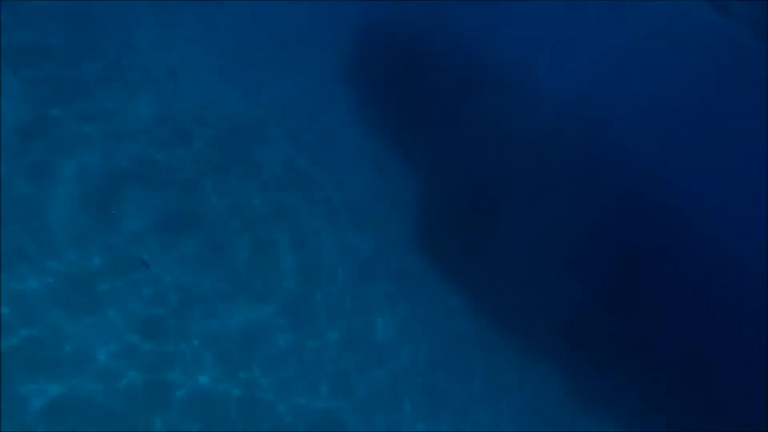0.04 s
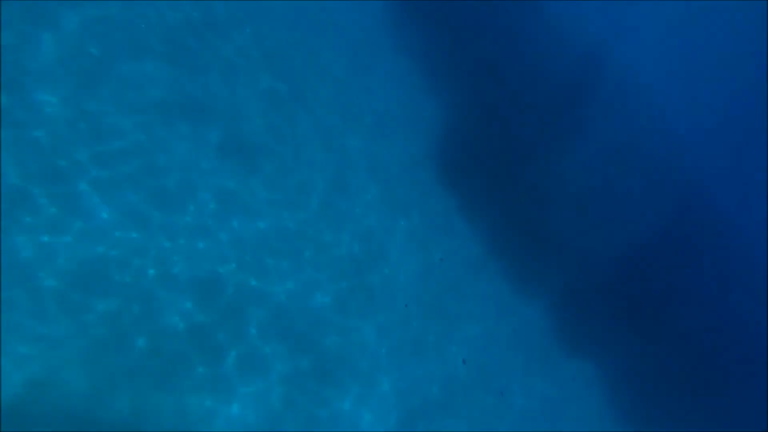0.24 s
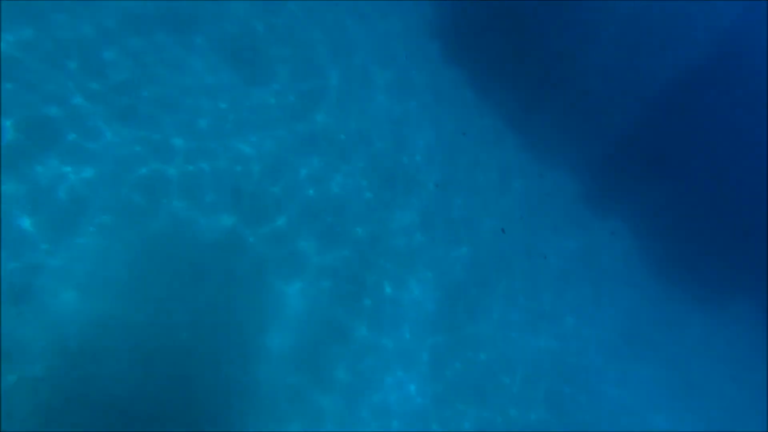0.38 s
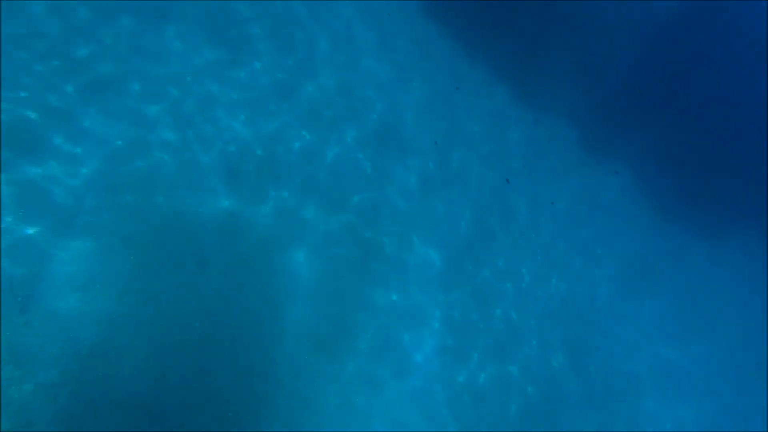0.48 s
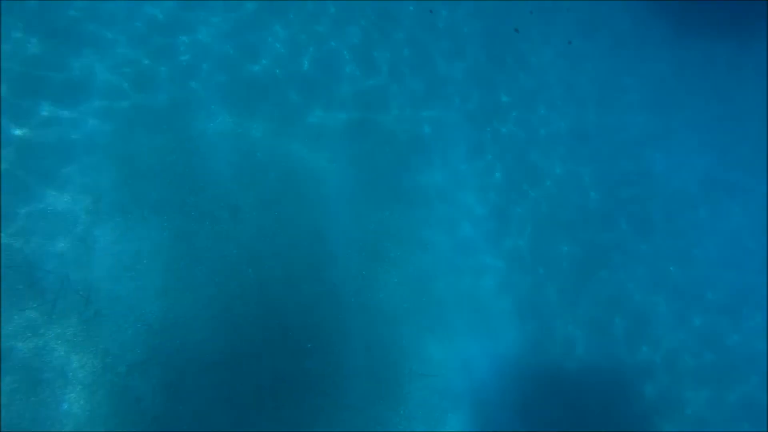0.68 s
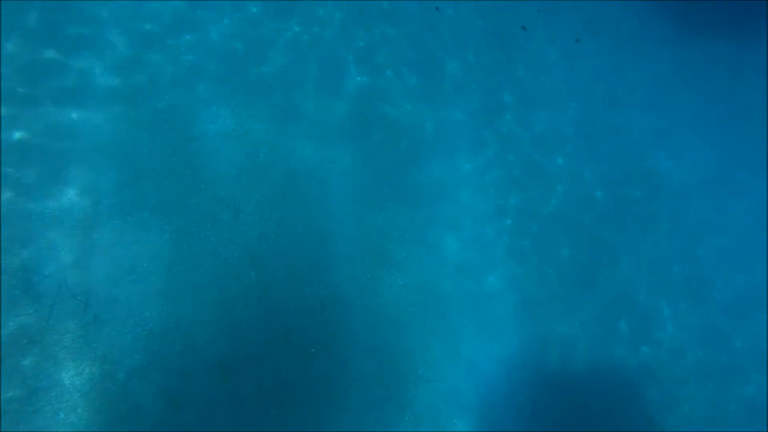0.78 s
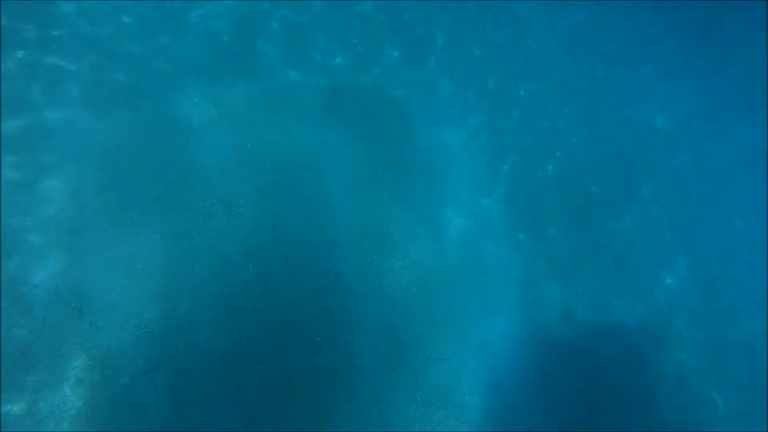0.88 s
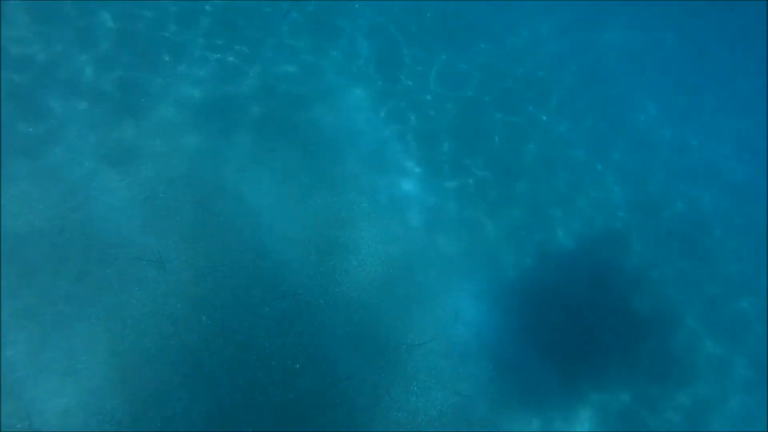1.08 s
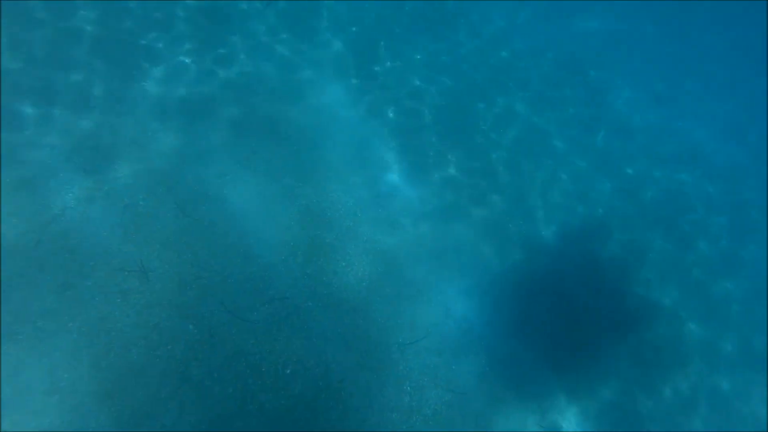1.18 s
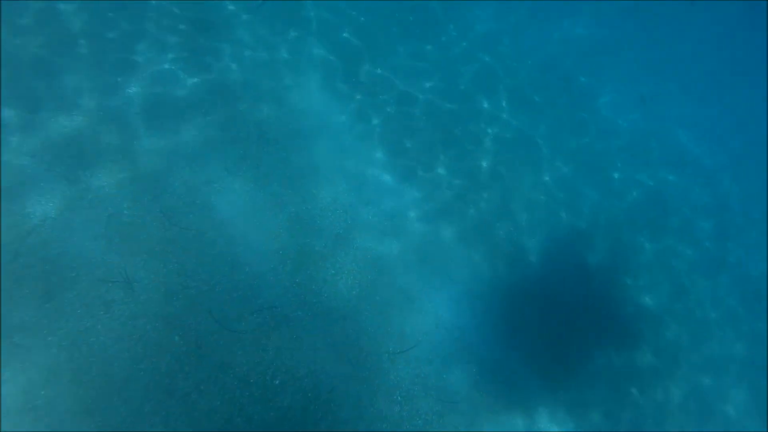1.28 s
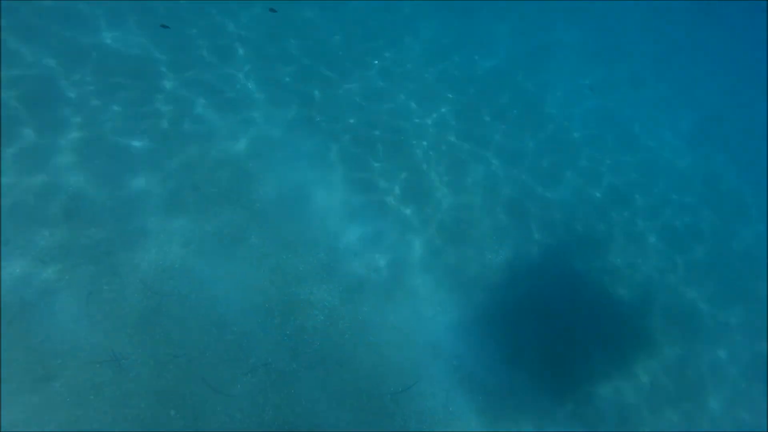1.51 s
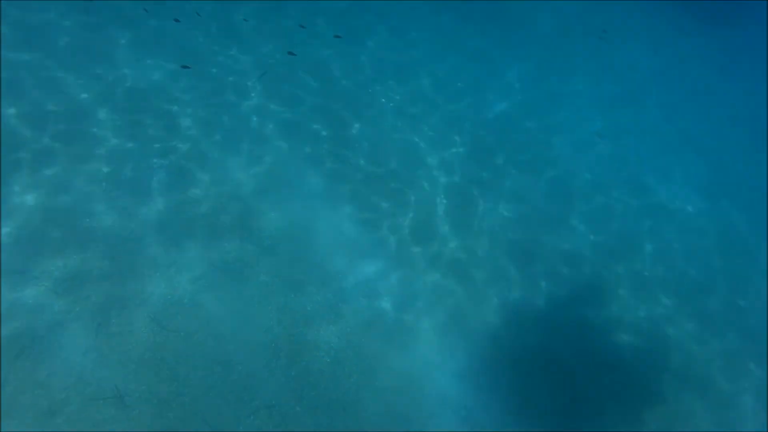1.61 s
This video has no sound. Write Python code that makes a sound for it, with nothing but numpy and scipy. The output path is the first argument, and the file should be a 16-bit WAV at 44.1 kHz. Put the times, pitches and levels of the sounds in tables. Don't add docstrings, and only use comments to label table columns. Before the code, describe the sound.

A plunge into the sea heard right at the microphone: wet slaps and hissing spray over churning bubbles, low air throbs, then muffled underwater gurgling that grows sparse and quiet.

```python
import sys
import numpy as np
from scipy import signal
from scipy.fft import rfft, irfft
from scipy.io import wavfile
from scipy.ndimage import uniform_filter1d, map_coordinates

SR = 44100
rng = np.random.default_rng(int(sys.argv[2]) if len(sys.argv) > 2 else 0)


def makeup_ratio(level_db):
    decades = np.asarray(level_db, float) / 20
    return 10 ** decades


def wav_out(sig):
    wavfile.write(sys.argv[1], SR, np.round(np.clip(np.atleast_2d(sig).T, -1, 1) * 32767).astype(np.int16))


N = 72765

LEAD = 0.8
LEAD_REST = np.sqrt(1 - LEAD ** 2)
GLIDE = 0.04


def unit(x):
    return x / np.sqrt(np.mean(x ** 2) + 1e-20)


def along(points, hz):
    f, v = np.transpose(points)
    return np.interp(np.log(hz + 1), np.log(f + 1), v)


def curves(rows):
    s, *cols = np.transpose(rows)
    return [np.interp(np.arange(N) / SR, s, c) for c in cols]


def wobble(rate):
    knots = rng.standard_normal(int(N * rate / SR) + 4)
    return map_coordinates(knots, [np.arange(N) * rate / SR])


def after(s, blur_s):
    return np.clip((np.arange(N) / SR - s) / blur_s + 0.5, 0, 1)


# frequency in Hz, phase scatter in radians.
PORT_PHASE = [(100, 0.083), (300, 1.66), (600, 2.35), (1200, 3), (2500, 1.62), (4500, 0.83), (10000, 1.8)]


def rush(spectrum, apart):
    hz = np.fft.rfftfreq(N, 1 / SR)
    z = rfft(rng.standard_normal((2, N))) * makeup_ratio(along(spectrum, hz))
    lagging = 1j * LEAD * z[0] + LEAD_REST * z[1]
    half_turn = np.clip(along(PORT_PHASE, hz), 0, 3) / 2
    mid, side = irfft(np.array([z[0], lagging * half_turn]), N)
    return unit(np.array([mid + apart * side, mid - apart * side]))


def rings(s, gain, hz, cycles, apart, size, glide=0, rise=0.65):
    start = np.clip(np.round(s * SR).astype(int), 0, N - 1)
    life = np.arange(size) / SR * (hz / cycles)[:, None]
    onset = 1 - np.exp(-life * cycles[:, None] / rise)
    fade = np.cos(np.linspace(0, np.pi / 2, size))
    shape = gain[:, None] * makeup_ratio(-30 * life) * onset * fade
    phase = 2 * np.pi * cycles[:, None] * life * (1 + glide * life)
    lead = LEAD + LEAD_REST * rng.standard_normal(len(s))
    turn = (along(PORT_PHASE, hz) * apart[start] * lead)[:, None] / 2
    at = (start[:, None] + np.arange(size)).ravel()
    port = lambda sign: np.bincount(at, (shape * np.sin(phase + sign * turn)).ravel(), N + size)[:N]
    return np.array([port(1), port(-1)])


def swarm(spectrum, apart, count, size, cycles, scatter_db):
    r = rng.random((count, 4))
    lo, hi = spectrum[0][0], spectrum[-1][0]
    hz = lo * (hi / lo) ** r[:, 1]
    gain = hz * makeup_ratio(along(spectrum, hz) - scatter_db * np.log(r[:, 2] + 0.04))
    x = rings(r[:, 0] * N / SR, gain, hz, cycles * (0.5 + r[:, 3]), apart, size, glide=GLIDE, rise=0.81)
    peak_db = max(db for _, db in spectrum)
    edge_db = np.minimum(along(spectrum, np.fft.rfftfreq(N, 1 / SR)) - peak_db + 18, 0)
    return unit(irfft(rfft(x) * makeup_ratio(edge_db), N))


# time in seconds, difference (0 = none, about 1
PORT_CONTRAST = [(0, 1.1), (.45, 0.58), (.6, 0.42), (1.0, 0.2), (1.1, 0.02), (1.25, 0.01), (1.65, 0.01)]


def ports():
    return np.clip(curves(PORT_CONTRAST)[0], 0, 2)


# start in seconds, peak in dB, ring in Hz, t60 in seconds,
# right port over left (signed).
SLAPS = [
    (.001, -10, 140, .06, -.3),
    (.0165, -13, 178, .09, -.55),
    (.0755, -8, 105, .14, -.55),
    (.113, -22, 36, .3, .8),
    (.3625, -12, 130, .04, -.1),
    (.381, -12, 70, .07, -.1),
    (.4315, -11, 200, .03, 4),
]
# frequency in Hz, level in dB, t60 in seconds.
HOUSING_RING = [(2900, -15, .011), (5600, -31, .01)]
SPLAT_S, SPLAT_SPRAY_DB = 0.0725, -4


def spatter(size):
    noise = rng.standard_normal(size)
    for width in (12, 9, 7):
        noise = uniform_filter1d(noise, size=width)
    return noise


def slaps():
    out = np.zeros((2, N + SR))
    t = np.arange(SR // 5) / SR

    def place(s, sound):
        out[:, round(s * SR):][:, :len(t)] += sound

    for s, db, hz, t60, right in SLAPS:
        rock = np.sin(2 * np.pi * hz * t * (1 + 3 * t)) * makeup_ratio(-60 * t / t60 - 900 * t ** 2)
        drops = 0.3 * makeup_ratio(-60 * t / 0.03) * np.minimum(t / 0.001, 1) * spatter(len(t))
        place(s, makeup_ratio(db) * (rock + drops) * np.array([[1], [right]]) / max(1, right))
    splat = sum(makeup_ratio(db - 60 * t / t60) * np.sin(2 * np.pi * hz * t) for hz, db, t60 in HOUSING_RING)
    splat = splat * (1 - np.exp(-t / 0.0008))
    place(SPLAT_S, splat * np.array([[1.5], [0.4]]))
    wet = makeup_ratio(SPLAT_SPRAY_DB) * np.exp(-((t - 0.004) / 0.002) ** 2) * spatter(len(t))
    place(SPLAT_S - 0.003, wet * np.array([[1.5], [-0.4]]))
    return out[:, :N]


# start in seconds, peak in dB, pitch in Hz, life in cycles.
TICKS = [(.001, -19, 2700, 12), (.002, -10, 450, 1.86), (.008, -35.5, 2950, 15), (.107, -15.5, 2340, 4.5),
         (0.152, -37, 1600, 11), (0.154, -44, 2150, 6.4), (.162, -27.5, 600, 15), (.275, -13, 1720, 6.2),
         (0.3736, -31, 2200, 5.4), (.412, -20.5, 2700, 8), (0.548, -16, 1300, 6.6),
         (0.5588, -17.5, 2500, 3.2), (.585, -37, 760, 8), (.607, -46.5, 2830, 6), (.619, -33.5, 1620, 22),
         (.643, -42.5, 3500, 8), (.668, -26, 700, 2.7), (.68, -42.5, 2280, 4.7), (.7147, -47, 2600, 5),
         (.743, -21, 750, 4.5), (0.773, -41.5, 2200, 7.3), (.797, -30.5, 665, 15), (.801, -50.5, 5200, 8.5),
         (.82, -26, 900, 6.4), (0.846, -60, 5600, 40), (.874, -48, 3500, 12), (.935, -25.5, 600, 6.5),
         (0.942, -46.5, 3600, 10), (0.976, -51, 3290, 19), (.975, -79.5, 5600, 27), (0.991, -71, 5550, 54),
         (.99, -50, 3900, 37), (.995, -38, 2300, 5), (1.008, -70, 5600, 22), (1.0223, -41, 2710, 5.9),
         (1.041, -52, 3800, 12), (1.076, -46, 1600, 8), (1.138, -49, 1450, 9), (1.1777, -51, 3600, 12),
         (1.216, -47, 2670, 11.5), (1.226, -47.5, 2500, 6.5), (1.297, -52.5, 1250, 6),
         (1.34, -52, 780, 7.6), (1.467, -60.5, 1150, 12), (1.522, -63, 1220, 10), (1.593, -55.5, 1020, 7)]
# start in seconds, peak in dB, pitch in Hz, life in cycles.
GULPS = [
    (.613, -19, 130, 1.5),
    (.692, -15.5, 130, 2),
    (0.719, -11.5, 150, 2.4),
]


def ticks():
    s, db, hz, life = np.transpose(TICKS + GULPS)
    rise = 0.17 * life[:, None] + 0.3
    return rings(s, makeup_ratio(db + 6.5), hz, life, 1.2 * ports(), size=1500, glide=GLIDE, rise=rise)


# time in seconds, level in dB.
SPRAY = [(0, -36), (.045, -56.5), (.085, -44.5), (.1, -35.5), (.12, -39), (.135, -45.5), (.19, -37.5),
         (.28, -32.5), (.36, -35), (.43, -37), (.455, -54.5), (.53, -46.5), (.6, -51.5), (.8, -68.5),
         (.9, -74.5), (1.1, -72), (1.24, -80.5), (1.65, -87)]
# frequency in Hz, density in dB per Hz.
FIZZ = [(530, -27), (900, -4), (2690, -7), (3710, -13.5), (6270, -11), (11200, -32.5), (14100, -51.5),
        (15500, -72.5)]
# frequency in Hz, density in dB per Hz.
CRACKLE = [(1100, -27), (1700, -8), (2700, -6.5), (3700, -8), (4250, -16.5), (4500, -26), (7500, -35.5),
           (9000, -120)]
SUBMERGED_S = 0.542
WETTED_S, FILM_HZ = 0.447, 8200


def spray():
    db, apart, under = curves(SPRAY)[0], ports(), after(SUBMERGED_S, 0.15)
    fizz = 0.8 * swarm(FIZZ, apart, count=3500, size=150, cycles=4, scatter_db=4) + rush(FIZZ, apart)
    film = irfft(rfft(fizz) / (1 + (np.fft.rfftfreq(N, 1 / SR) / FILM_HZ) ** 16), N)
    fizz = fizz + after(WETTED_S, 0.01) * (film - fizz)
    crackle = swarm(CRACKLE, apart, count=700, size=400, cycles=11, scatter_db=4.5)
    crackle = crackle + 0.65 * rush(CRACKLE, apart)
    return makeup_ratio(db - 1.5 + 1.5 * wobble(45)) * ((1 - under) * fizz + under * crackle)


# time in seconds, level in dB.
CHURN = [(0, -19.5), (.035, -65), (.06, -40.5), (.075, -31), (.135, -42.5), (.2, -37), (.27, -23.5),
         (.32, -33), (.425, -25), (.455, -38.5), (.52, -35), (.65, -32), (.78, -38), (.84, -32.5),
         (.92, -38.5), (1.05, -41), (1.25, -43), (1.65, -43.5)]
# frequency in Hz, density in dB per Hz.
CHURN_NEAR = [(120, -36.5), (200, -2), (355, -3.5), (783, -9.5), (1860, -27), (3500, -38.5), (4550, -45.5),
              (7700, -120)]
# frequency in Hz, density in dB per Hz.
CHURN_FAR = [(25, -17), (200, -5.5), (320, 0.5), (400, -15.5), (690, -19.5), (1400, -41.5), (1800, -52.5),
             (4800, -57.5), (7000, -120)]
LOUD_DB, QUIET_DB = -33, -43


def churn():
    db, apart = curves(CHURN)[0], ports()
    near = np.clip((db - QUIET_DB) / (LOUD_DB - QUIET_DB), 0, 1)
    close = swarm(CHURN_NEAR, apart, count=1300, size=1200, cycles=6, scatter_db=3.5)
    close = close + 0.55 * rush(CHURN_NEAR, apart)
    far = 0.6 * swarm(CHURN_FAR, apart, count=900, size=2500, cycles=7, scatter_db=1.5)
    far = far + rush(CHURN_FAR, apart)
    swell = makeup_ratio(db - 1.5 + 2.2 * wobble(30))
    return swell * (np.sqrt(near) * close + np.sqrt(1 - near) * far) * makeup_ratio([[1.2], [-1.2]] * apart)


# start in seconds, length in seconds, level in dB,
# pitch in Hz, left over right in dB.
SURGES = [
    (0.063, 0.041, -36.5, 43.7, -4),
    (0.239, 0.065, -20, 55.7, 5.5),
    (0.329, 0.058, -27.5, 50.7, 8),
    (0.37, 0.081, -15.5, 57, 2.5),
]
SURGE_OVERTONES = [-8.5, -15, -15, -22]
SURGE_SKEW = 0.74


def surges():
    out, t = np.zeros((2, N)), np.arange(N) / SR
    for s, length, db, hz, pan in SURGES:
        u = np.clip((t - s) / length, 0, 1)
        phase = 2 * np.pi * hz * (t - s) + 0.5 * wobble(29.6)
        tone = np.sin(phase)
        for k, overtone_db in enumerate(SURGE_OVERTONES):
            level = makeup_ratio(overtone_db + 4.15 * wobble(40))
            tone += level * np.sin((k + 2) * phase + SURGE_SKEW * k + 0.99 * wobble(25))
        swell = np.sin(np.pi * u ** 1.1) ** 0.85
        out += makeup_ratio(db + 4.5) * swell * tone * makeup_ratio([[pan / 2], [-pan / 2]])
    return out


# start in seconds, peak in dB, pitch in Hz, life in cycles.
BUBBLES = [(0.22, -13.5, 222, 4.3), (0.406, -21, 1446, 16.3), (.517, -20.5, 517, 13), (.546, -27, 814, 18),
           (.645, -11, 284, 2.45), (.711, -44.5, 1598, 140), (.746, -13, 202, 3.1), (0.821, -21, 489, 8.5),
           (.873, -23.5, 542, 17), (0.943, -13, 317, 3.2), (1.021, -26.5, 703, 15), (1.083, -33, 391.5, 44),
           (1.109, -39.5, 1344, 15), (1.137, -15.5, 157.2, 2.4), (1.354, -31.5, 310, 27),
           (1.51, -29.5, 318.4, 17)]


def bubbles():
    s, db, hz, life = np.transpose(BUBBLES)
    return rings(s, makeup_ratio(db + 1.5), hz, life, 0.61 * ports(), size=4000, glide=GLIDE, rise=0.87)


# start in seconds, level in dB, length in seconds,
# brightness in dB.
GUSHES = [(0.27, -31.5, 0.0087, -9), (0.469, -42.5, 0.062, -4), (0.535, -33.5, 0.051, -13),
          (0.553, -40, 0.0099, -5), (0.711, -43, 0.026, -13.5), (0.746, -34.5, 0.0088, -32.5),
          (0.77, -48, 0.0087, -11), (0.803, -52, 0.013, -10), (0.827, -46, 0.037, -16.5),
          (0.842, -43.5, 0.02, -22.5), (0.938, -33.5, 0.012, -23.5), (0.989, -45.5, 0.024, -10.5),
          (1.02, -44, 0.027, -30), (1.074, -45.5, 0.011, -21), (1.124, -50, 0.014, -17),
          (1.135, -52, 0.0064, -35), (1.201, -44.5, 0.013, -11.5), (1.224, -55, 0.005, -10)]


def gushes():
    t, apart = np.arange(N) / SR, ports()
    low, high = np.zeros(N), np.zeros(N)
    for s, db, length, bright_db in GUSHES:
        u = np.clip((t - s) / length, 0, 30)
        swell = u * np.exp(-2.5 * u)
        low += makeup_ratio(db + 9.0) * swell
        high += makeup_ratio(db + bright_db + 9.5) * swell
    dull_spectrum = [(200, -12), (350, 0), (900, -5), (1700, -16)]  # (Hz, dB per Hz)
    dull = swarm(dull_spectrum, apart, count=3500, size=500, cycles=3, scatter_db=1.5)
    bright = swarm(CRACKLE, apart, count=5000, size=200, cycles=6, scatter_db=2)
    return 2 * (low * dull + high * bright)


# time in seconds, pitch in Hz, level in dB.
POCKET = [(.45, 67.67, -36), (.5, 73.72, -32), (.6, 92.67, -32.5), (.645, 104.5, -24), (.69, 111, -33),
          (.76, 148.4, -27), (.88, 159.9, -33), (.94, 169.8, -40.5), (1.03, 163.4, -48), (1.15, 150, -42),
          (1.22, 109, -39), (1.27, 92.5, -40.5), (1.33, 102.2, -49), (1.65, 102.3, -66.5)]
POCKET_OVERTONES = [-12, -18]
POCKET_JITTER, POCKET_ROUGH, POCKET_SLOSH_DB = 0.08, 0.8, -4


def pocket():
    hz, db = curves(POCKET)
    phase = 2 * np.pi * np.cumsum(hz * (1 + POCKET_JITTER * wobble(40))) / SR
    rough = POCKET_ROUGH * (wobble(60) * np.sin(phase) + wobble(60) * np.cos(phase))
    tone = np.sin(phase) + rough
    for k, overtone_db in enumerate(POCKET_OVERTONES):
        tone += makeup_ratio(overtone_db + 5 * wobble(30)) * np.sin((k + 2) * phase + wobble(13))
    slosh_spectrum = [(20, -26.0), (60, -4.5), (140, 1.5), (220, -7), (400, -77.0)]  # (Hz, dB per Hz)
    slosh = rush(slosh_spectrum, 0.8 * ports())
    throb = unit(tone) * after(0.471, 0.011) + makeup_ratio(POCKET_SLOSH_DB) * slosh
    return makeup_ratio(db) * throb * makeup_ratio([[1.5], [-1.5]] * ports())


def scene():
    return slaps() + ticks() + spray() + churn() + surges() + bubbles() + gushes() + pocket()


def low_pass(x):
    return signal.sosfilt(signal.butter(12, 15730, fs=SR, output="sos"), x)


# time in seconds, peak in dB.
OVERLOADS = [(.4059, -30), (.4165, -25), (.422, -29), (.4325, -27), (.438, -32), (.5328, -56), (.5377, -54),
             (.5487, -51), (.411, -38), (1.6498, -50)]
HISS_DB = -106


def record(dry):
    clicks = np.zeros(N)
    for s, db in OVERLOADS:
        clicks[round(s * SR)] = makeup_ratio(db + 6)
    hiss = makeup_ratio(HISS_DB) * rng.standard_normal(N)
    mix = dry + clicks * np.array([[0.5], [1.3]]) + hiss
    return low_pass(mix)


dry = scene()
out = record(dry)
wav_out(out)
```